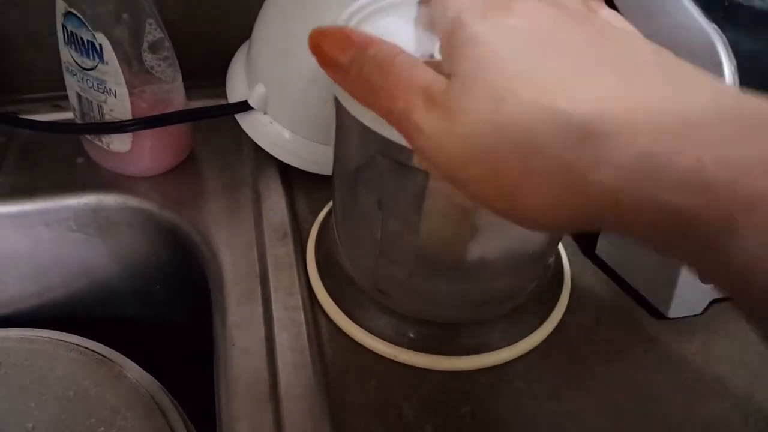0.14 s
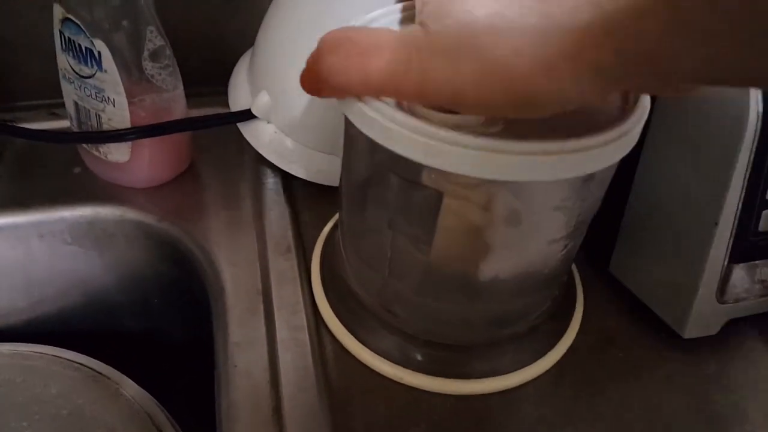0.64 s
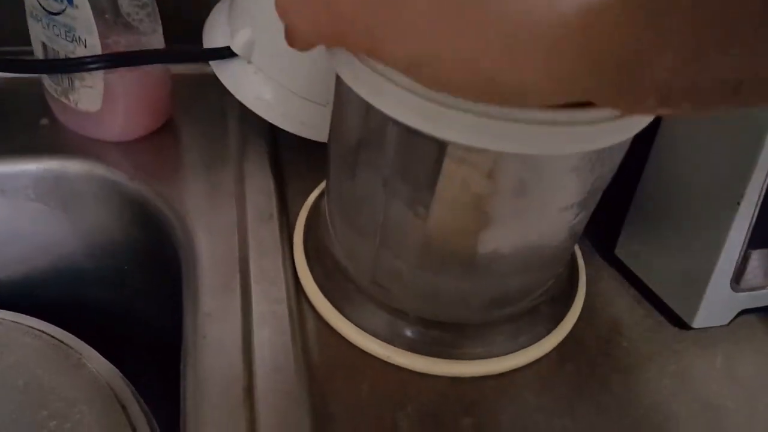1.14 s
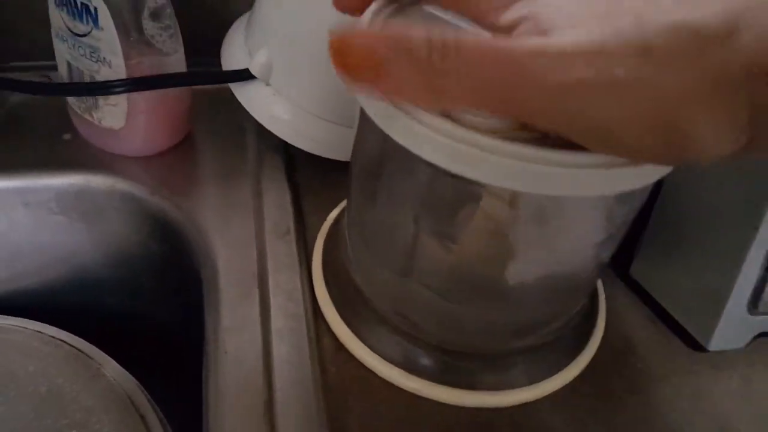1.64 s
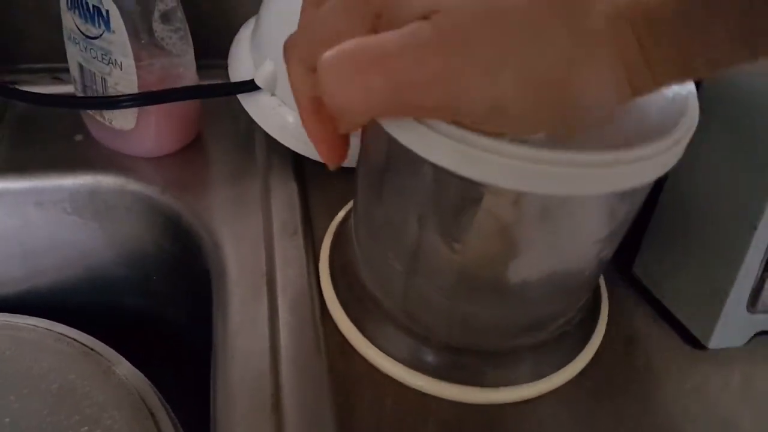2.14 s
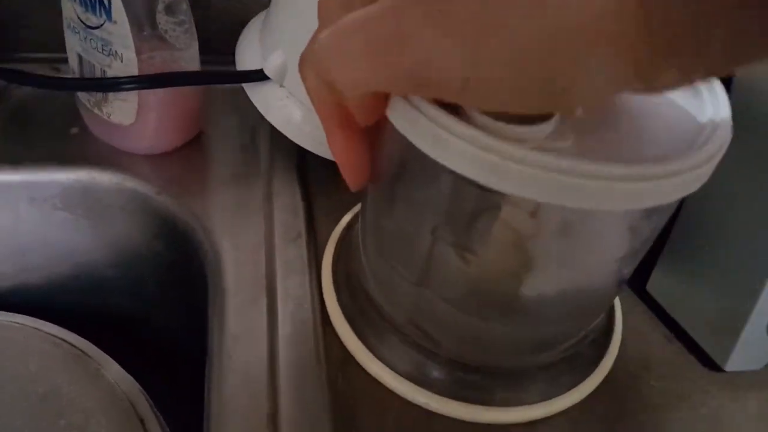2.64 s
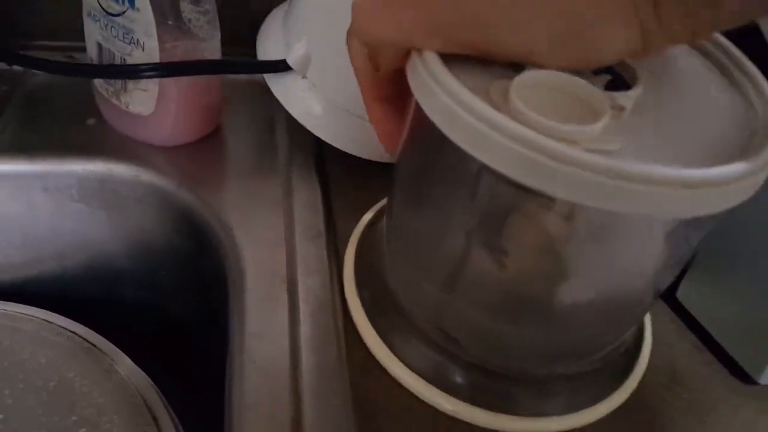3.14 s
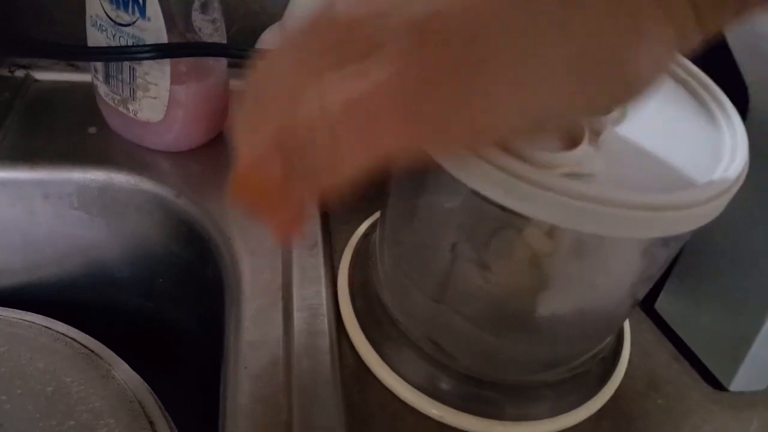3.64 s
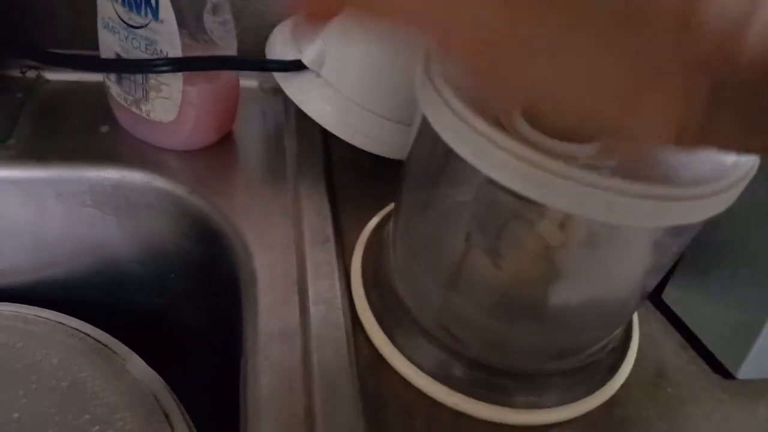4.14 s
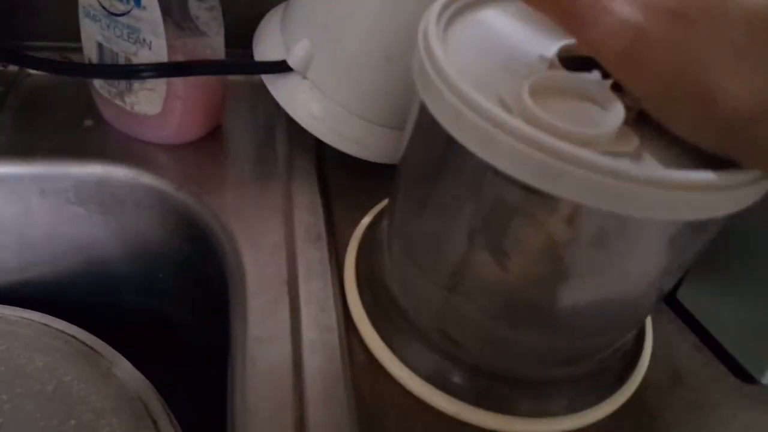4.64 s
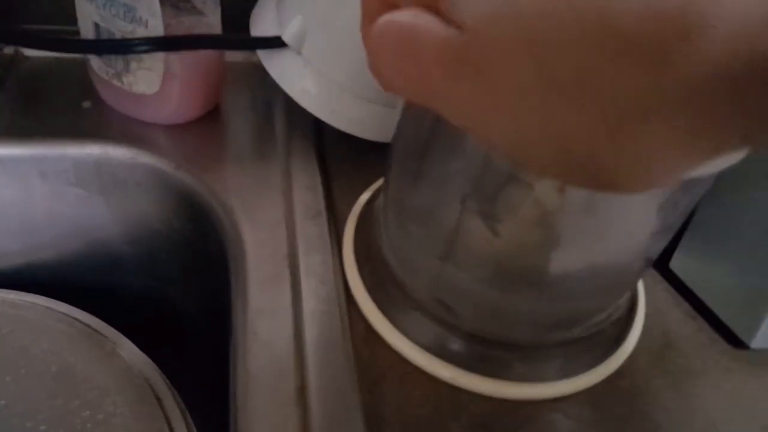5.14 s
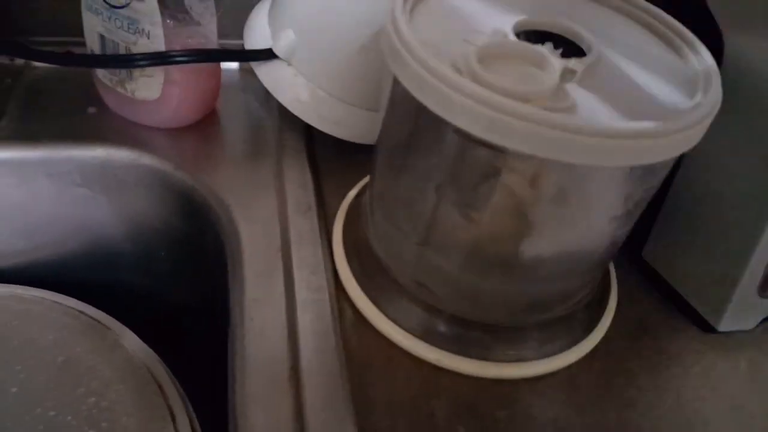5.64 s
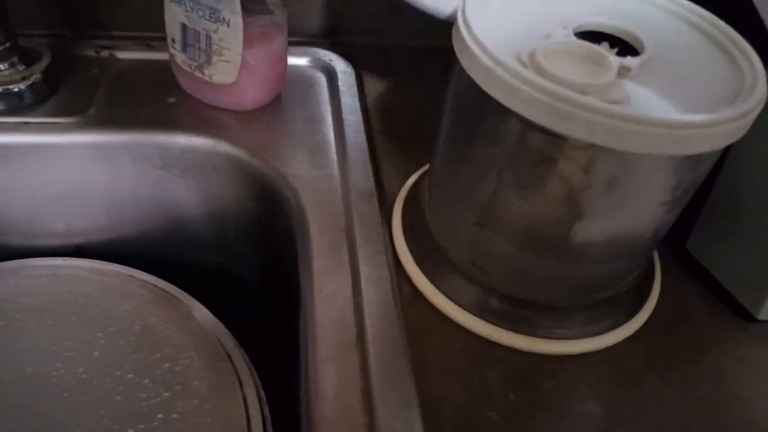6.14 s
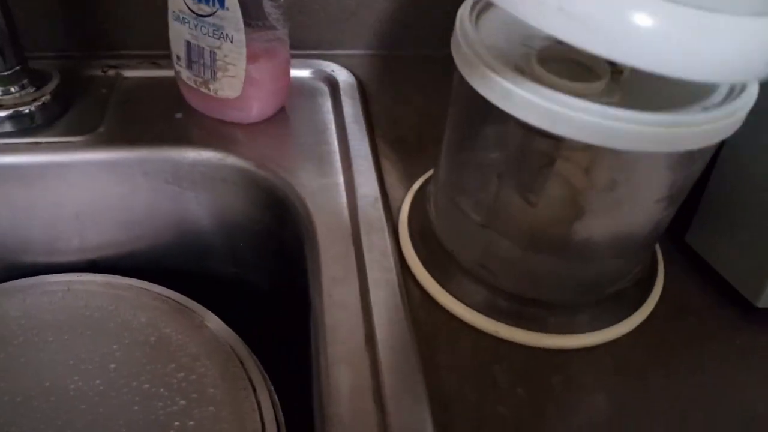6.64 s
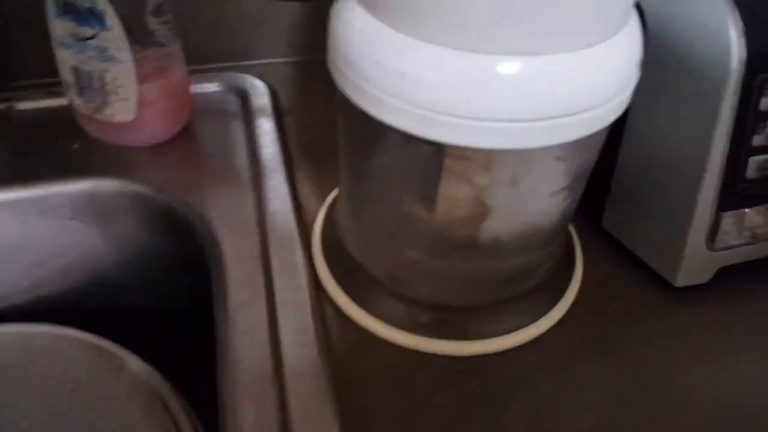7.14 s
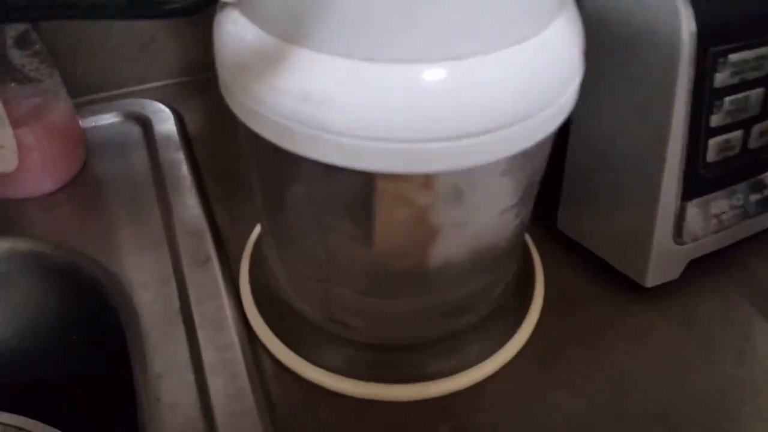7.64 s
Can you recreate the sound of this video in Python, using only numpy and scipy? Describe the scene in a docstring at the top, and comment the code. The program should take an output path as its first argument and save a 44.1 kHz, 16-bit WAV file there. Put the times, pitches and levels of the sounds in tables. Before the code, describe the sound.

Close clacks, palm squeaks and hollow booms of a plastic chopper jar being closed in a quiet kitchen, ending with two switch clicks.

```python
"""Chopper lid in a kitchen

Close to a phone in a small kitchen, a hand presses a plastic lid onto a chopper jar standing on a worktop.
Skin rubs the plastic (uneven slips in a squeak band); the rim snaps and knocks (noise bursts, struck modes).
Jar air, jar wall and worktop boom as decaying modes; shifting grip and rocking stir them as resonant noise.
The motor head is set on top, a switch clicks and the motor just starts as brush noise in its housing.
Room air and a faint mains hum lie under it all."""
import sys
import numpy as np
from scipy import signal
from scipy.fft import rfft, irfft
from scipy.io import wavfile
from scipy.ndimage import uniform_filter1d

SR = 44100
rng = np.random.default_rng(int(sys.argv[2]) if len(sys.argv) > 2 else 0)


def unload_wav(signal):
    """Save mono or channel-first audio to the path in sys.argv[1] as 16-bit WAV at rate SR, clipped to [-1, 1]."""
    wavfile.write(
        sys.argv[1],
        SR,
        np.round(np.clip(np.atleast_2d(signal).T, -1, 1) * 32767).astype(np.int16),
    )


def voltage_ratio(level):
    """Linear amplitude factor for a level in decibels (scalar or array-like)."""
    return 10 ** (np.asarray(level, float) / 20)


N = 342216  # samples

# Room air spectrum: pitch_hz, relative_db_per_hz
AIR_SPECTRUM = [(15, -27), (25, -13.5), (49, -3.5), (126, 6), (253, -5.5), (340, -17.5), (537, -11.5),
                (1800, -20), (3170, -24.5), (6210, -41), (10100, -53.5), (13900, -32.5), (15500, -53)]
# Mains hum partials: pitch_hz, rms_db
HUM_PARTIALS = [(60, -76), (120, -69.5), (180, -70)]
# Hand strokes over the lid: firmest_s, swell_s, fade_s, hiss_db, dry_treble_relative_db
STROKES = [(.02, .05, .06, -68.5, -9), (0.099, 0.026, 0.15, -56, 6.5), (.365, 0.018, 0.033, -57.5, 4),
           (.47, 0.071, 0.098, -57, -7.5), (.56, 0.046, 0.078, -58, -8), (.67, 0.069, 0.093, -53, -2.5),
           (.77, 0.076, 0.082, -49, -6.5), (.86, 0.048, .03, -52.5, 0), (.96, .05, 0.043, -53.5, -5),
           (1.26, 0.067, 0.033, -62, -7), (1.35, 0.043, .06, -56.5, -3.5), (1.416, 0.043, 0.032, -52, -4.5),
           (1.47, .04, 0.037, -68, -11), (1.63, .03, 0.034, -66, 1.5), (1.69, 0.042, .05, -65.5, 0.5),
           (1.82, .12, 0.14, -69.5, -7.5), (1.965, 0.038, .04, -53.5, -8), (2.0, 0.037, 0.087, -62.5, 4),
           (2.11, 0.073, 0.067, -61, 1.5), (2.21, 0.058, .12, -63, -10), (2.45, .06, 0.077, -63.5, -8.5),
           (2.69, 0.094, 0.053, -60.5, -6), (2.88, 0.095, 0.07, -57, -1.5), (2.96, 0.067, .1, -51.5, -5),
           (3.11, .05, 0.076, -60.5, -4.5), (3.19, .04, 0.093, -66, -5), (3.41, .05, 0.086, -69, -8),
           (3.52, .04, .04, -67.5, -1), (3.591, 0.046, 0.056, -52.5, -7.5), (3.66, 0.047, 0.072, -62, -5),
           (3.84, .03, .05, -61.5, -6), (3.94, .08, 0.078, -66, -9), (4.2, 0.043, 0.049, -56.5, -8),
           (4.39, 0.035, 0.047, -55.5, -2), (4.48, .05, 0.084, -70.5, -8), (4.79, 0.058, .04, -63, -6),
           (4.865, 0.049, .05, -47.5, -5), (4.94, .03, 0.043, -59, -4), (5.0, .03, 0.043, -65, -2),
           (5.08, 0.022, 0.057, -49.5, -8), (5.17, .06, 0.076, -54.5, -9), (5.29, 0.042, 0.053, -61, -8),
           (5.42, .1, 0.19, -69.5, -13), (5.62, 0.085, 0.032, -60, -8), (5.72, 0.07, 0.085, -67, -13),
           (5.871, 0.047, 0.049, -50.5, -3.5), (5.97, .02, 0.048, -44.5, -13), (6.04, .04, .06, -51.5, -16),
           (6.13, 0.056, .1, -64, -10), (6.52, .04, 0.079, -65, -15), (6.63, 0.051, 0.031, -64, -8),
           (6.7, .02, 0.089, -42, -14), (6.875, .02, .045, -36.5, -12.5), (6.98, .01, 0.035, -42.5, -15),
           (7.074, .02, 0.046, -48, -9.5), (7.185, .02, 0.027, -62, -8.5), (7.44, .05, 0.087, -70, -7.5),
           (7.55, .06, .1, -72, -5.5), (7.67, .02, .04, -57.5, -7.5)]
# Skin friction spectrum: pitch_hz, relative_db_per_hz
SKIN_SPECTRUM = [(290, -46.5), (500, -26), (553, -8.5), (996, -3), (1350, -11), (1820, -16.5), (2650, -7),
                 (3060, -2), (6540, -8), (7800, -13.5), (9920, -20), (14000, -24.5), (14800, -40),
                 (15500, -60)]
# Skin friction resonances: pitch_hz, width_hz, relative_db
SKIN_PEAKS = [(1850, 220, 20), (3300, 230, -10.5), (5500, 1700, -5.5)]
# Squeak band, lower as the palm presses flatter: time_s, pitch_hz
SQUEAK_PITCH = [(0, 2000), (.8, 1700), (1.4, 1950), (2.0, 1880), (2.2, 1600), (2.7, 1880), (2.9, 1700),
                (3.6, 1680), (4.79, 1800), (4.83, 1100), (4.93, 1120), (4.97, 1650), (5.1, 1800),
                (5.2, 1450), (5.6, 1780), (5.85, 1250), (6.1, 1080), (6.3, 1550), (7.76, 1350)]
# Lid modes: pitch_hz, relative_db, longest_t60_s
LID_MODES = [(1000, -4, .04), (1090, -2, .05), (1250, -3, .035), (1380, -3, .04), (1600, -2, .035),
             (1790, 0, .04), (1950, -2, .035), (2150, -4, .03), (2400, -6, .025), (2750, -7, .02),
             (3150, -4, .03), (3800, -10, .012), (5250, -5, .015), (6300, -7, .012)]
# How firmly the hand works the jar: time_s, stir_db
GRIP_LEVEL = [(0, -76), (.5, -69), (.8, -62), (1.3, -63.5), (1.75, -62.5), (2.2, -69.5), (2.5, -73.5),
              (2.8, -71), (3.02, -64.5), (3.3, -68.5), (3.6, -60.5), (4.05, -65), (4.3, -70), (4.67, -75),
              (5.0, -60.5), (5.3, -64), (5.75, -72.5), (6.3, -68), (7.2, -62), (7.4, -72.5), (7.76, -63.5)]
# Jar rocking on its base after a shove: widest_swing_s, jar_db, worktop_db
ROCKS = [(.4, -58, -43.5), (1.02, -43, -51), (1.08, -58, -38), (1.64, -45, -49), (4.03, -72, -48),
         (4.43, -67, -46), (6.07, -51.5, -31), (6.42, -50, -27.5), (6.51, -43, -56.5), (6.85, -30, -36),
         (6.98, -28, -29), (7.09, -50.5, -43)]
# Jar resonances stirred by the grip: pitch_hz, relative_db
JAR_STIRRED = [(250, 3.5), (305, 1.5), (325, 6), (355, 1.5), (484, -7)]
# Deep worktop modes: pitch_hz, relative_db, t60_s
WORKTOP_LOW = [(59, -16, 0.12), (72.3, -2.5, 0.16), (99.1, -17.5, 0.088), (119.5, 7, 0.2),
               (142, -13.5, .12)]
# Upper worktop modes: pitch_hz, relative_db, t60_s
WORKTOP_UP = [(169.6, 0.5, 0.11), (209.6, -4, 0.21), (244.4, -7.5, 0.14)]
# Kitchen reverberation: pitch_hz, t60_s
KITCHEN_T60 = [(100, 0.25), (300, 0.19), (1000, 0.24), (3000, 0.22), (8000, 0.19)]
# Hard plastic contacts: start_s, level_db, strongest_ring_hz, brightness_db, length_t60_s
CRACKS = [(.083, -51, 3060, 9, .12), (.1726, -35.5, 2170, -12, .12), (.191, -12, 1230, -9.5, .04),
          (.2114, -17, 1787, 1, 0.064), (.2215, -17, 1160, -9, 0.043), (.2377, -29.5, 1850, -3, 0.044),
          (.359, -44.5, 1800, 0.5, .12), (.3755, -24.5, 1710, -14, 0.035), (.532, -35.5, 1800, -23, 0.033),
          (.6429, -30.5, 2840, -9, 0.026), (.7546, -43.5, 2150, -15, .04), (.8058, -26, 1065, -4.5, 0.049),
          (.8407, -31.5, 3500, -13, 0.036), (.845, -17, 1650, -7, 0.026), (.8905, -14.5, 1110, -5, 0.059),
          (.9044, -20.5, 990, -34, .036), (.9812, -24, 1080, -10, 0.075), (.9932, -18.5, 1640, -4.5, 0.072),
          (1.0415, -18.5, 1070, -11, .055), (1.273, -36, 1080, -8, 0.061),
          (1.2843, -39.5, 1103, -10, 0.076), (1.3058, -13.5, 1740, -10.5, 0.022),
          (1.512, -14.5, 1035, -16, 0.051), (1.525, -23.5, 1010, -3.5, .032),
          (1.7589, -24, 1770, -17, .016), (1.8642, -35.5, 1730, -31, 0.013), (1.955, -37, 1900, -22, .016),
          (2.1611, -32.5, 1630, -17, 0.023), (2.3531, -51, 1080, -20, .035), (2.8644, -42, 1630, -14, .022),
          (3.0984, -47, 2040, -26, .056), (3.2495, -8, 1390, -8.5, 0.038),
          (3.3457, -26.5, 1090, -11, 0.034), (3.7373, -13, 2150, -13, .035), (3.748, -16, 1090, -34, 0.016),
          (3.806, -34, 1800, -20, .03), (3.816, -31, 1370, -4, 0.045), (3.9679, -45.5, 1830, -24, .04),
          (4.1988, -44, 1730, -18, 0.046), (4.352, -55, 1730, 8, .1), (4.3888, -48, 1850, -7, .04),
          (4.5523, -49, 1286, 6.5, .032), (4.8334, -36.5, 1070, -8, .11), (4.855, -32.5, 1090, -27, .11),
          (4.8743, -31.5, 1073, -27, .11), (4.9816, -42.5, 1720, -4, 0.037),
          (5.0479, -16, 1976, -10, 0.052), (5.5842, -26, 1770, -17, .017), (5.907, -23, 1060, -9.5, 0.065),
          (5.9253, -14, 1640, -9.5, .051), (5.953, -21.5, 2670, -13, .034), (6.0322, -38, 988, -26, .027),
          (6.0683, -42.5, 980, -4, .058), (6.1051, -45.5, 980, -13, .086), (6.1965, -45, 1710, -18.5, .031),
          (6.2551, -11.5, 1034, -1.5, 0.038), (6.2771, -20.5, 1380, -14.5, 0.041),
          (6.326, -31.5, 1010, -6.5, 0.05), (6.358, -51, 2970, 21.5, 0.084), (6.3906, -11, 1460, -17, .077),
          (6.4003, -16, 1200, -5.5, 0.073), (6.4232, -19, 1090, -8, 0.096), (6.6324, -44, 1600, -12, .04),
          (6.6702, -10, 1140, -7.5, 0.047), (6.703, -19, 1600, -30, .023),
          (6.7326, -21.5, 1810, -15, 0.061), (6.7655, -30, 1072, -5, 0.049),
          (6.789, -40.5, 1360, -6.5, .04), (6.8195, -24, 1604, -6.5, 0.043),
          (6.829, -15.5, 1430, -8, 0.037), (6.8445, -9.5, 974, -2.5, .052), (6.874, -21, 1570, -19.5, .037),
          (6.931, -13.5, 1370, -10.5, .12), (6.9601, -10, 1114, -5.5, 0.039), (7.06, -32, 960, -22, .089),
          (7.0914, -42.5, 1650, -21, .024), (7.396, -47, 1300, -14, .03), (7.5071, -41, 1010, -23.5, .031),
          (7.5454, -46.5, 1010, -21.5, .036), (7.6441, -14.5, 2990, -6.5, .028),
          (7.7129, -14.5, 3080, -6.5, 0.015)]
# Snap spectrum: pitch_hz, relative_db_per_hz
CRACK_SPECTRUM = [(240, -13.5), (400, -4), (809, -9.5), (1880, -1.5), (2430, -9), (3060, -10), (4280, -17),
                  (5150, -18), (9210, -33), (14300, -48), (15500, -57)]
# Blows that boom: start_s, jar_air_db, jar_air_hz, worktop_relative_db, jar_wall_relative_db
BOOMS = [(.191, -30, 333, -0.5, -2.5), (.215, -17, 325, -13.5, -28), (.237, -23.5, 336, -13, -27),
         (.372, -37, 382, -3.5, -16.5), (.388, -50.5, 344, 7, -9), (.494, -41.5, 326, -10, -12),
         (.531, -35, 330, -20.5, -12.5), (.643, -43, 307, -4.5, -2), (.806, -41.5, 322, -21, -0.5),
         (.847, -39.5, 354, -3, -5.5), (.89, -20.5, 324, -3, 5.5), (.982, -21.5, 321, 5, -15),
         (.995, -21, 329, -9, -13.5), (1.038, -25, 315, -0.5, 8.5), (1.405, -42, 350, -4, -19),
         (1.51, -13.5, 280, 0.5, 0.5), (1.524, -18.5, 363, 0, -8), (1.764, -39, 327, -15, -22),
         (1.86, -44.5, 320, -12.5, -35), (2.165, -41.5, 336, -6, -14), (2.353, -54, 314, -5, -1.5),
         (2.863, -40, 377.5, -8.5, -38), (3.102, -34, 307.6, -8, -21), (3.248, -10, 319, -9, -7),
         (3.738, -33, 329, -3, 1), (3.753, -40, 340, 1, -2), (3.814, -24.5, 336, -29, -21),
         (4.019, -62.5, 283, 12, -14), (4.158, -46, 323, -9, -25), (4.201, -38, 287, -14.5, -13.5),
         (4.353, -46.5, 347, -6.5, 2.5), (4.393, -46, 351, 3, -16.5), (4.55, -60, 276, 15.5, -17),
         (4.978, -41, 314, 4, -17), (5.047, -22, 340.2, -32, -21), (5.584, -46, 323, -27, -4),
         (5.906, -25.5, 313.6, -1.5, 1.5), (5.95, -29.5, 325, -2, 4.5), (6.031, -33, 359, -15, -3.5),
         (6.059, -39.5, 362, -5.5, -1.5), (6.257, -9.5, 327.3, -4.5, -11), (6.388, -15.5, 279.6, -6, 7.5),
         (6.396, -11, 341, 1.5, 4.5), (6.408, -19, 287, 0, -10.5), (6.424, -15, 385, -9.5, -4.5),
         (6.671, -11.5, 334, -13.5, -22.5), (6.732, -18, 331, -26, -24), (6.777, -21.5, 336, -19, -24.5),
         (6.827, -16, 322, -9, -14.5), (6.843, -8, 319.5, -8, -7.5), (6.931, -11, 315, -5.5, -9),
         (6.958, -16, 312, -6.5, -8.5), (7.058, -30, 287, 7, 0), (7.088, -43, 278, 11, 3.5),
         (7.547, -52.5, 309, -4, 1), (7.645, -41.5, 333, -4, -12), (7.711, -43, 280, 1, -28)]
# Jar wall modes: pitch_hz, relative_db, t60_s
JAR_WALL = [(322, -12, .7), (655, -26, .7), (443, 10, .1), (485, -3, 0.26), (544, -5.5, 0.085),
            (659, -3.5, .2), (735.3, 5.5, 0.11), (777, -6, 0.13), (857, -17.5, .15), (965, -19.5, .1)]
# Jar air modes: pitch_factor, relative_db, t60_s
JAR_AIR = [(1, 1, 0.086), (1.09, -8.5, 0.093), (.93, -14, .16)]
# Motor level: time_s, rms_db
MOTOR_LEVEL = [(7.72, -46.5), (7.735, -48), (7.75, -40), (7.76, -42)]
# Motor housing resonances: pitch_hz, width_hz of one pass, relative_db
MOTOR_PEAKS = [(325, 140, 7), (1250, 460, 5.5), (1976, 580, 4), (3034, 110, 3), (3970, 1100, 0),
               (7360, 2500, -5)]
# Likeness of the ports: pitch_hz, left_right_likeness
PORT_SAME = [(40, .995), (80, .99), (130, .94), (300, .97), (600, .8), (1200, .65), (4000, .55),
             (12000, .6)]
# Level between the ports: pitch_hz, left_over_right_db
PORT_BALANCE = [(60, -1.5), (92, 3.5), (140, -0.5), (210, 5.5), (330, 1), (500, 0.5), (770, 3.5), (1170, 6),
                (1790, 10.5), (2740, 10.5), (4190, 12), (6410, 19), (9810, -12), (15000, -1.5)]
# Phase between the ports: pitch_hz, left_lead_rad
PORT_PHASE = [(20, -.1), (70, -0.1), (125, -0.57), (250, 0), (780, 1.11), (1380, 1.5), (2240, 0.22),
              (2580, -2), (3010, 0.52), (3960, 4), (4820, 5), (6030, 4), (8180, 10.5), (10200, 0),
              (10600, 9.5), (11500, 18.5), (15200, 5)]
# Port hiss: pitch_hz, white_noise_gain_db
PORT_HISS = [(100, -73.5), (3000, -73.5), (7000, -73.5), (10000, -84.5), (13000, -76), (15500, -90)]


def evened(x):
    """Scales to rms 1."""
    return x / np.sqrt(np.mean(x ** 2) + 1e-20)


def read(points, hz):
    """Reads a table along log frequency."""
    f, value = np.transpose(points)
    return np.interp(np.log(hz + 1), np.log(f + 1), value)


def colour(x, db_points):
    """Shapes x by a spectrum."""
    hz = np.fft.rfftfreq(len(x), 1 / SR)
    return irfft(rfft(x) * voltage_ratio(read(db_points, hz)), len(x))


def resonate(x, hz, width_hz):
    """Shifts hz down to zero, smooths, and shifts back: a resonance of gain 1."""
    turn = np.exp(2j * np.pi * np.cumsum(hz * np.ones(len(x))) / SR)
    r = np.exp(-np.pi * width_hz / SR)
    return 2 * (turn * signal.lfilter([1 - r], [1, -r], x / turn + 1e-18)).real


def resonate_twice(x, hz, width_hz):
    """Two equal resonances in series: steeper skirts."""
    return resonate(resonate(x, hz, width_hz), hz, width_hz)


def wander(seconds):
    """Slow chance of rms 1: noise averaged twice."""
    size = int(seconds * SR)
    return evened(uniform_filter1d(uniform_filter1d(rng.standard_normal(N), size), size))


def ring(modes, t, luck, spread_db, rise_cycles):
    """A struck body of peak 1; where the blow lands sets how much each mode takes."""
    hz, db, t60 = np.transpose(modes)[:, :, None]
    share, detune = luck[:len(modes), :1], luck[:len(modes), 1:]
    rise = 1 - np.exp(-t * hz / rise_cycles)
    swing = voltage_ratio(db + spread_db * share - 60 * t / t60) * rise
    phase = 2 * np.pi * hz * (1 + 0.013 * detune) * t + 3 * share
    sound = (swing * np.sin(phase)).sum(0)
    return sound / abs(sound).max()


def background():
    """Room air as shaped noise, and mains hum as wavering sines."""
    t = np.arange(N) / SR
    hum = np.zeros(N)
    for hz, rms_db in HUM_PARTIALS:
        level = voltage_ratio(rms_db + 0.6 * wander(0.092)) * np.sqrt(2)
        hum += level * np.sin(2 * np.pi * (hz * t + rng.random()))
    air = evened(colour(rng.standard_normal(N), AIR_SPECTRUM))
    return voltage_ratio(-63.5) * air + hum


def strokes():
    """Skin drags over the lid in tiny uneven slips and squeaks in a drifting band."""
    catches = (rng.random(N) < 400 / SR) * voltage_ratio(3.2 * np.minimum(rng.exponential(1, N), 4))
    slips = rng.standard_normal(N) * voltage_ratio(1.3 * wander(0.003)) + 3.0 * catches
    drag = evened(colour(slips * voltage_ratio(1.2 * wander(0.029)), SKIN_SPECTRUM))
    peaks = sum(voltage_ratio(db) * resonate(drag, hz, width_hz) for hz, width_hz, db in SKIN_PEAKS)
    luck = rng.standard_normal((len(LID_MODES), 2))
    lid = ring(LID_MODES, np.arange(2000) / SR, luck, spread_db=3.0, rise_cycles=.4)
    stirred_lid = evened(signal.oaconvolve(drag, lid)[:N])
    hiss = evened(drag + 1.6 * peaks) + 0.45 * stirred_lid
    dull = colour(hiss, [(3000, -6.0), (4000, -21.5)])
    dry_treble = evened(colour(hiss, [(3000, -26), (4000, -2.0)]))
    squeak_hz = np.interp(np.arange(N) / SR, *np.transpose(SQUEAK_PITCH)) * (1 + 0.025 * wander(.08))
    body = evened(dull + 4.8 * resonate(drag, squeak_hz, 160))

    body_power, treble_power = np.zeros((2, N))
    fade_db = 15.  # lost one swell before and one fade after the firmest drag
    for s, swell_s, fade_s, db, treble_db in STROKES:
        first = max(round((s - 2 * swell_s) * SR), 0)
        at = np.arange(first, min(round((s + 2 * fade_s) * SR), N))
        away = (at / SR - s) / np.where(at / SR < s, swell_s, fade_s)
        level_db = db - fade_db * away ** 2
        body_power[at] += voltage_ratio(2 * level_db)
        treble_power[at] += voltage_ratio(2 * (level_db + treble_db))
    return np.sqrt(body_power) * body + np.sqrt(treble_power) * dry_treble


def grip(rub):
    """The shifting grip and the rocking base stir the jar and the worktop; rubbing stirs the jar further."""
    rise_db_per_s, fall_db_per_s, top_over_jar_db = 179.5, 200., 5.5
    t = np.arange(N) / SR
    firm = voltage_ratio(np.interp(t, *np.transpose(GRIP_LEVEL)))
    jar_gain, top_gain = firm, firm * voltage_ratio(top_over_jar_db)
    for s, jar_db, top_db in ROCKS:
        swing = voltage_ratio(np.minimum(rise_db_per_s * (t - s), fall_db_per_s * (s - t)))
        jar_gain = jar_gain + voltage_ratio(jar_db) * swing
        top_gain = top_gain + voltage_ratio(top_db) * swing
    shake = rng.standard_normal(N) * voltage_ratio(3.4 * wander(0.011))
    jar = sum(voltage_ratio(db) * evened(resonate_twice(shake, hz, 41)) for hz, db in JAR_STIRRED)
    top = sum(voltage_ratio(db) * evened(resonate_twice(shake, hz, 27)) for hz, db, _ in WORKTOP_LOW[1:4])
    rub_gain = 0.37 * uniform_filter1d(abs(rub), size=600)
    return (jar_gain + rub_gain) * evened(jar) + top_gain * evened(top)


def kitchen(x):
    """Room echo: sparse taps of random sign, each band dying at its own speed."""
    taps = np.zeros((2, SR // 2))
    slots = np.arange(130, SR // 2 - 20, 20)
    at = slots + rng.integers(0, 20, (2, len(slots)))
    np.put_along_axis(taps, at, rng.choice([-1., 1.], at.shape), 1)
    hz, t, z = signal.stft(taps, SR, nperseg=256)
    decay = voltage_ratio(-60 * t / read(KITCHEN_T60, hz)[:, None])
    tail = signal.istft(z * decay, SR, nperseg=256)[1]
    return signal.fftconvolve(x[None], tail / np.linalg.norm(tail[0]), axes=1)[:, :N]


def cracks():
    """A noisy snap rattles the lid's modes; the spot of the contact adds one clear short ring."""
    out, t = np.zeros(N + SR), np.arange(int(.2 * SR)) / SR
    luck = rng.standard_normal((len(CRACKS), len(LID_MODES), 2))
    grit = rng.standard_normal((len(CRACKS), len(t)))
    edges = np.minimum(t / 0.00058, 1) * signal.windows.tukey(2 * len(t), .2)[len(t):]
    for (s, db, ring_hz, bright_db, t60), chance, noise in zip(CRACKS, luck, grit):
        # modes far from the strongest ring take less; short contacts damp the lid
        modes = [(hz, d - min(14 * abs(np.log2(hz / ring_hz)), 10.5), decay * min(t60 / 0.036, 1))
                 for hz, d, decay in LID_MODES]
        burst = evened(colour(noise, CRACK_SPECTRUM)) * voltage_ratio(-60 * t / max(t60, .005))
        chatter = noise[-300:] * voltage_ratio(-60 * t[:300] / .008)  # the contact rattles for a few ms
        struck_lid = ring(modes, t, chance, spread_db=1.5, rise_cycles=.4)
        lid = signal.fftconvolve(struck_lid, chatter)[:len(t)]
        spot = ring([(ring_hz, 0, 0.67 * t60)], t, chance, spread_db=0, rise_cycles=1.4)
        share = np.clip(.58 + 0.006 * (db + 25), 0, 1)  # louder contacts ring more purely
        ringing = 0.57 * lid / abs(lid).max() + 0.36 * spot
        tilt = [(1000, 0.), (2500, 2.), (4200, bright_db + 15), (8000, bright_db + 23),
                (10000, 1.8 * bright_db + 13), (13000, 0.16 * bright_db + 17)]
        crack = colour(0.65 * (1 - share) * burst + share * ringing, tilt)
        out[round(s * SR):][:len(t)] += voltage_ratio(db) * crack * edges
    return out[:N]


def booms():
    """The air in the jar hoots at a pitch set by how far the hand covers the hole; wall and worktop ring along."""
    out, t = np.zeros(N + SR), np.arange(int(.55 * SR)) / SR
    luck = rng.standard_normal((len(BOOMS), 4, len(JAR_WALL), 2))
    grit = rng.standard_normal((len(BOOMS), len(t)))
    thud_shape = voltage_ratio(-60 * t / 0.11) * np.minimum(t / 0.0022, 1)
    ending = signal.windows.tukey(2 * len(t), .3)[len(t):]
    for (s, air_db, air_hz, top_db, wall_db), chance, noise in zip(BOOMS, luck, grit):
        thud = evened(resonate_twice(noise, 620, 530)) * thud_shape
        wall = 0.46 * thud + 0.76 * ring(JAR_WALL, t, chance[3], spread_db=0.5, rise_cycles=0.33)
        air_modes = [(air_hz * factor, db, t60) for factor, db, t60 in JAR_AIR]
        air = ring(air_modes, t, chance[0], spread_db=2.5, rise_cycles=0.55)
        low = ring(WORKTOP_LOW, t, chance[1], spread_db=1.5, rise_cycles=0.94)
        up = ring(WORKTOP_UP, t, chance[2], spread_db=1.0, rise_cycles=2.0)
        deeper_db = -0.1939 * (air_db + top_db + 20)  # light blows are deeper
        worktop = voltage_ratio(top_db - 2 + deeper_db) * low + voltage_ratio(top_db + .4 - deeper_db) * up
        boom = air + worktop + voltage_ratio(wall_db) * wall
        out[round(s * SR):][:len(t)] += voltage_ratio(air_db) * boom * ending
    return out[:N]


def motor():
    """The first turns of the motor: brush noise in the resonances of the housing."""
    s, db = np.transpose(MOTOR_LEVEL)
    t = np.arange(s[0], N / SR, 1 / SR)
    brushes = rng.standard_normal(len(t))
    housing = sum(voltage_ratio(d) * evened(resonate_twice(brushes, hz, width_hz)) for hz, width_hz, d in MOTOR_PEAKS)
    sound = voltage_ratio(np.interp(t, s, db)) * evened(housing)
    return np.r_[np.zeros(N), sound][-N:]  # set at the very end


def scene():
    """Each port hears the jar from another side: long waves arrive alike, the treble less so."""
    rubs = [strokes() for port in range(2)]
    deep = booms() + grip(rubs[0])
    near = np.array([cracks() + rub + motor() for rub in rubs])
    echo = voltage_ratio(-13.5) * kitchen(near[0] + deep)
    left, other = rfft(near + echo)
    same = np.clip(read(PORT_SAME, np.fft.rfftfreq(N, 1 / SR)), 0, 1)
    right = same * left + np.sqrt(1 - same ** 2) * other
    return irfft(np.array([left, right]), N) + deep + background()


def roll_off(x):
    """The treble ends steeply here."""
    return signal.sosfilt(signal.butter(12, 15640, fs=SR, output="sos"), x)


def record(dry):
    """The phone's body sets level and phase between the ports; bass rolls off, ports hiss, peaks are squeezed."""
    hz = np.fft.rfftfreq(N, 1 / SR)
    half = voltage_ratio(read(PORT_BALANCE, hz) / 2) * np.exp(.5j * read(PORT_PHASE, hz))
    shading = np.array([half, 1 / half]) * 2 / (abs(half) + 1 / abs(half))
    ports = irfft(rfft(dry) * shading, N)
    capsule = signal.butter(2, 45, "high", fs=SR, output="sos")
    ports = signal.sosfilt(capsule, ports)
    ports = ports + np.array([colour(rng.standard_normal(N), PORT_HISS) for port in range(2)])
    return roll_off(1.199 * np.tanh(ports / 0.94))


dry = scene()
out = record(dry)
unload_wav(out)
```